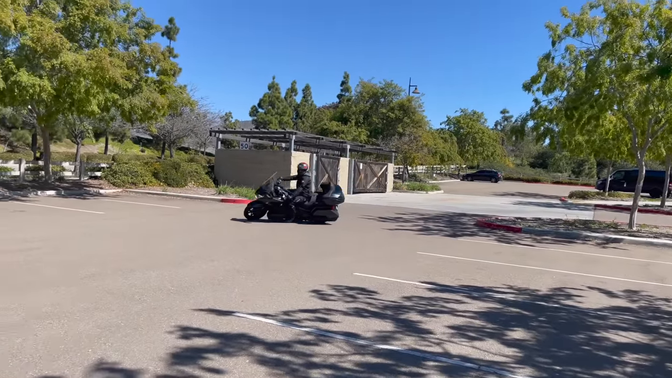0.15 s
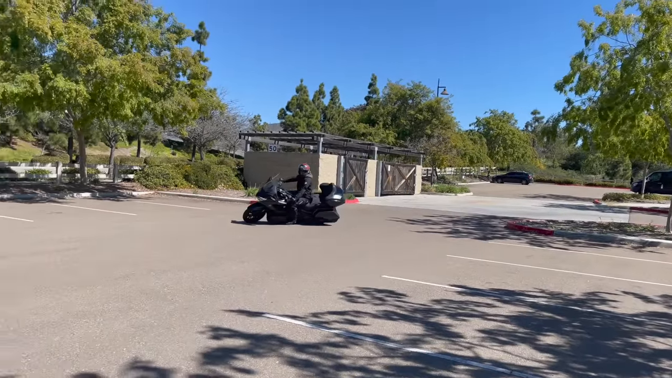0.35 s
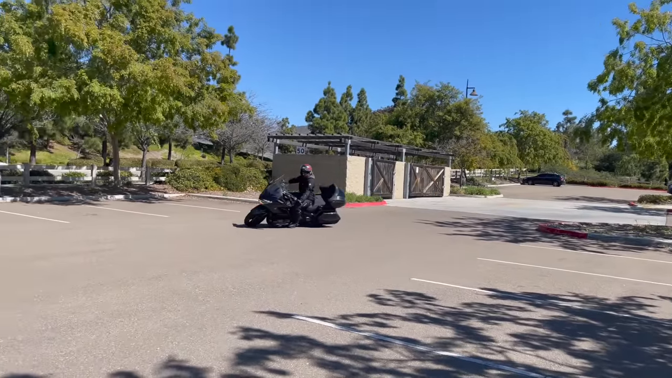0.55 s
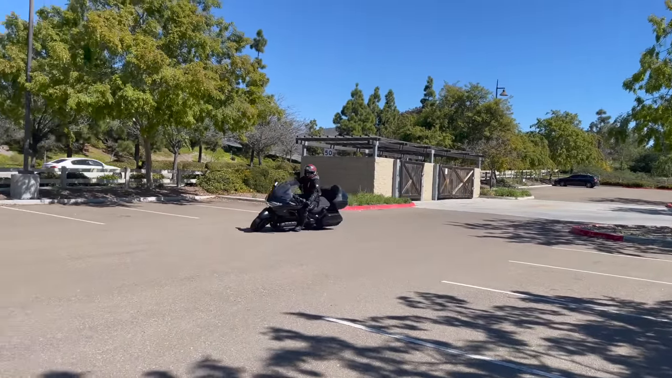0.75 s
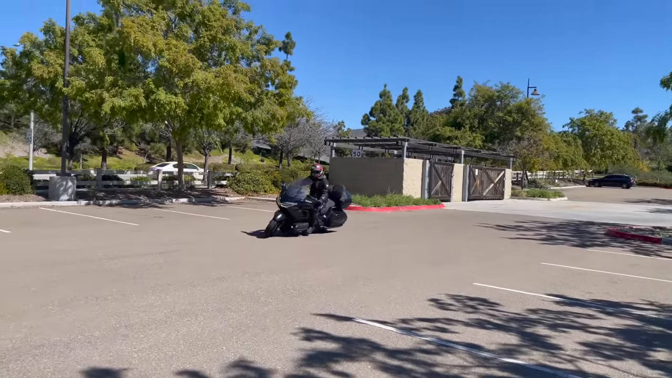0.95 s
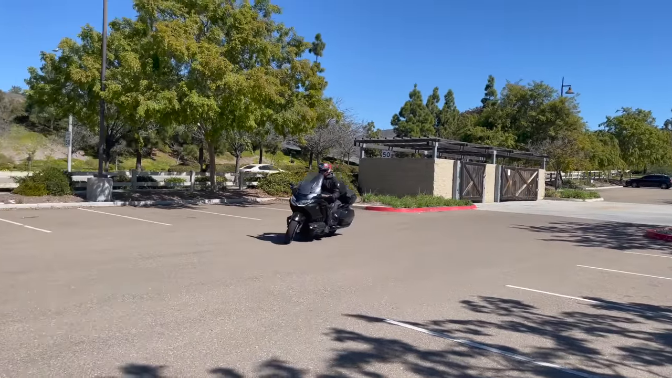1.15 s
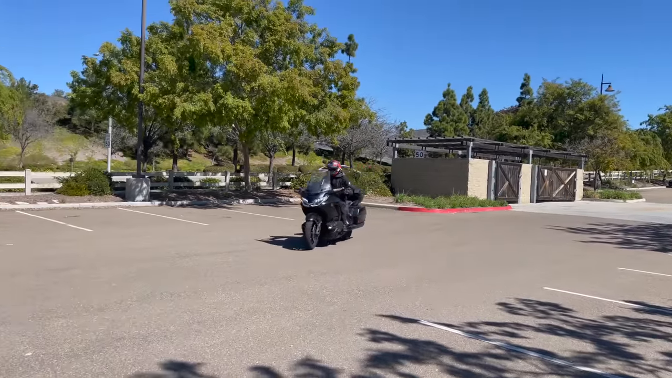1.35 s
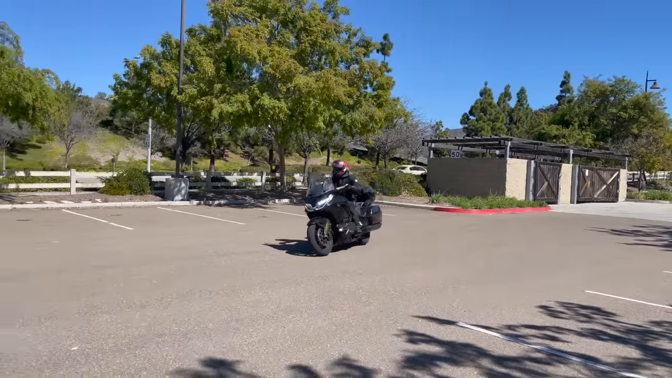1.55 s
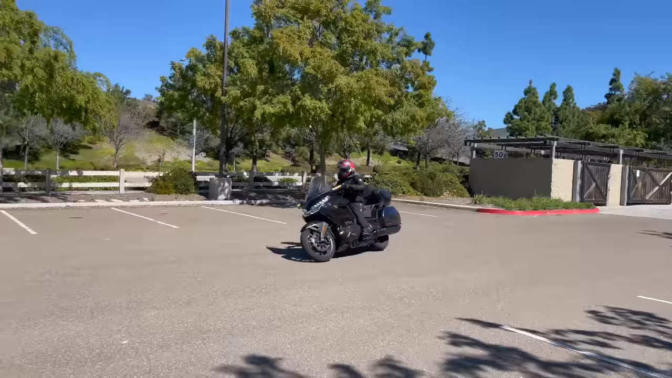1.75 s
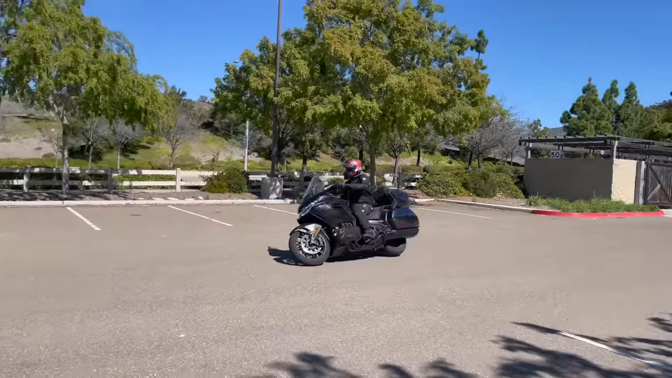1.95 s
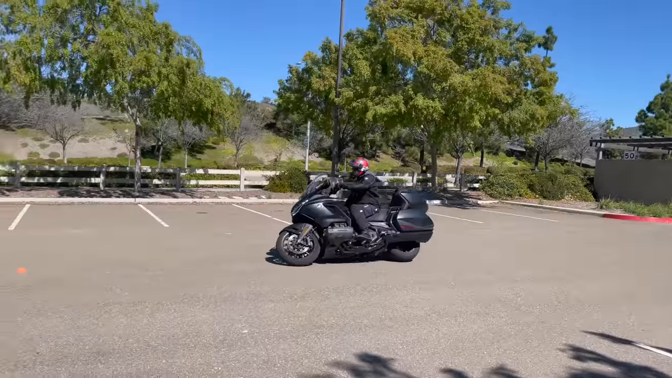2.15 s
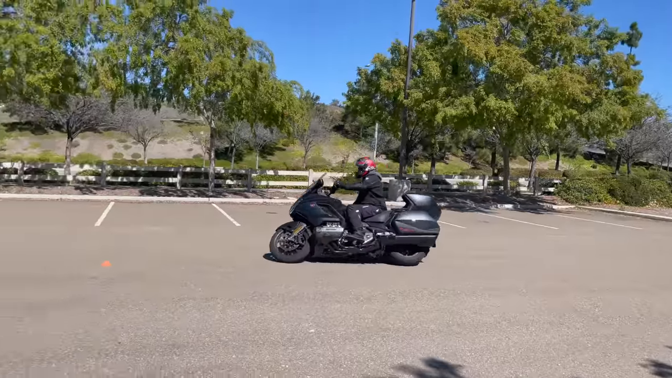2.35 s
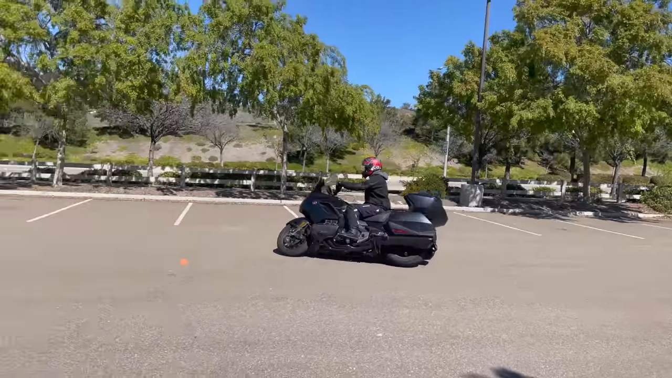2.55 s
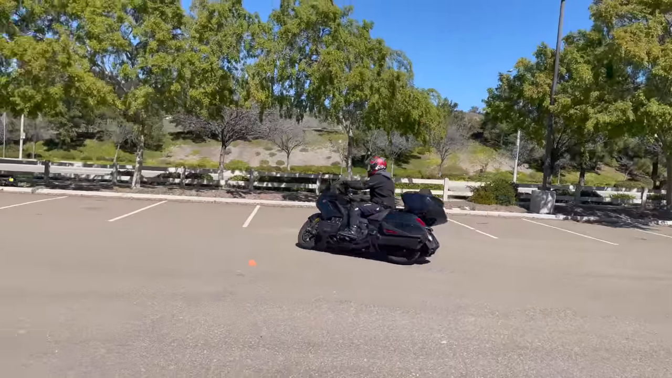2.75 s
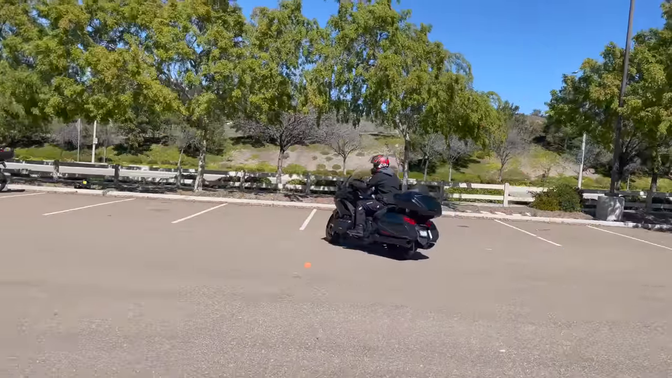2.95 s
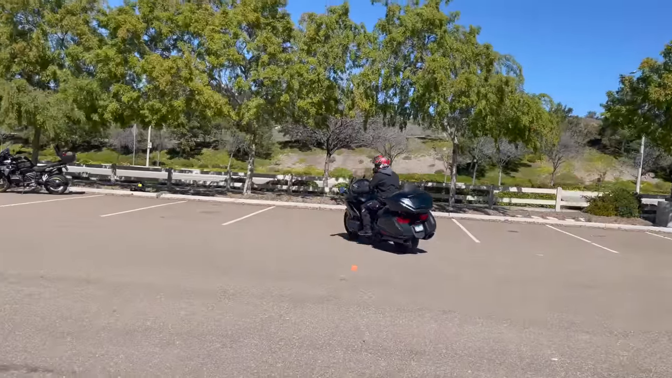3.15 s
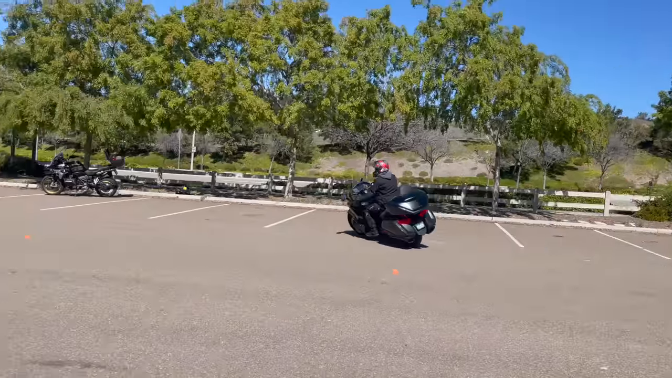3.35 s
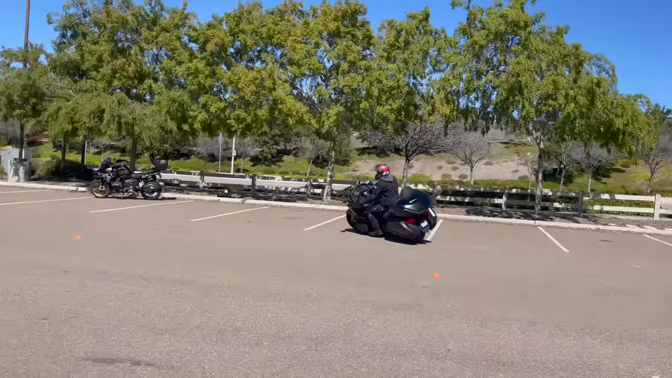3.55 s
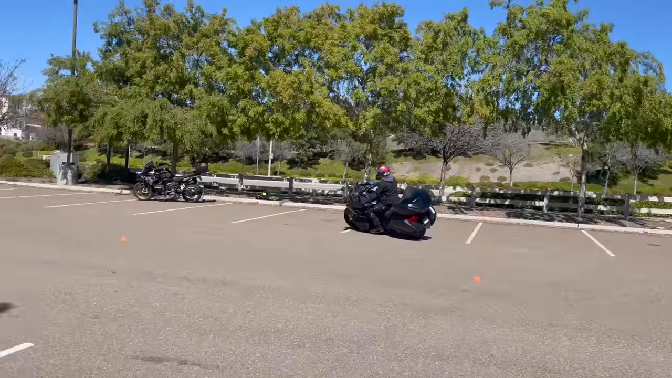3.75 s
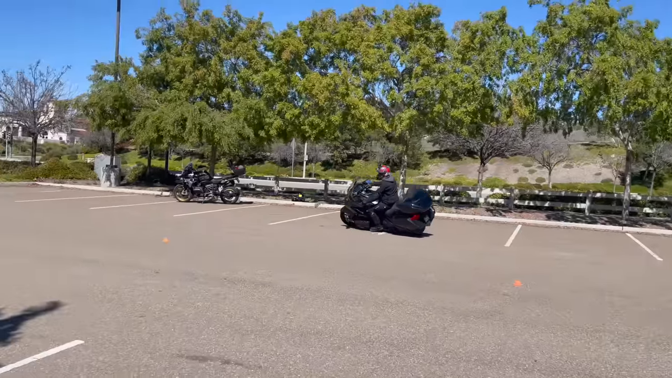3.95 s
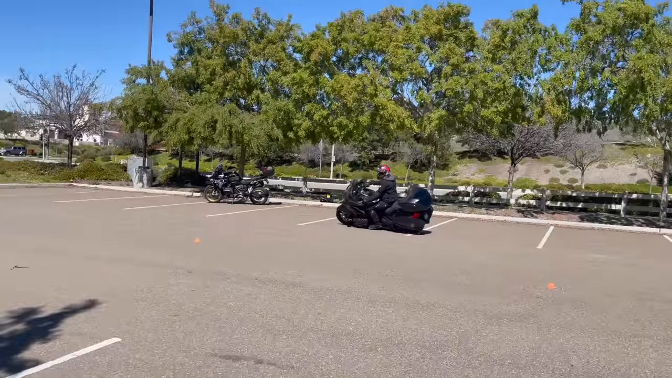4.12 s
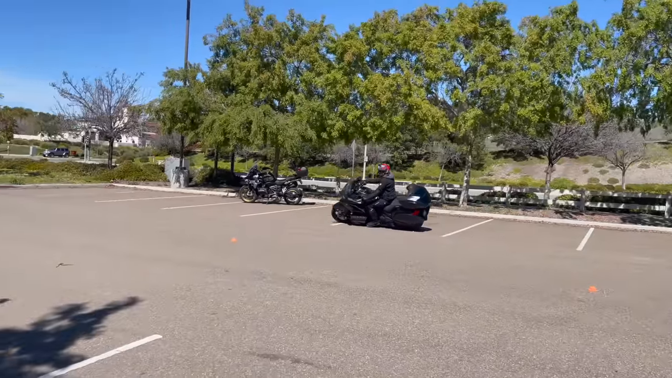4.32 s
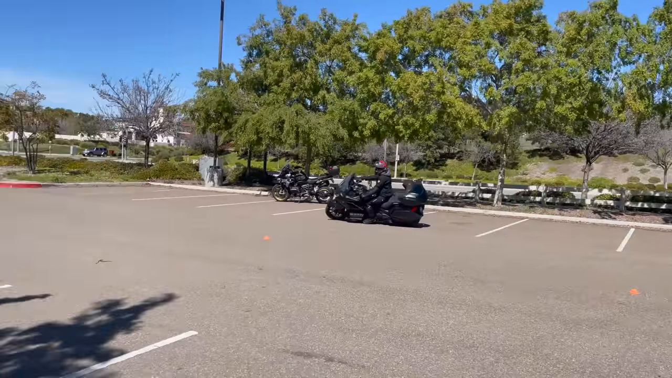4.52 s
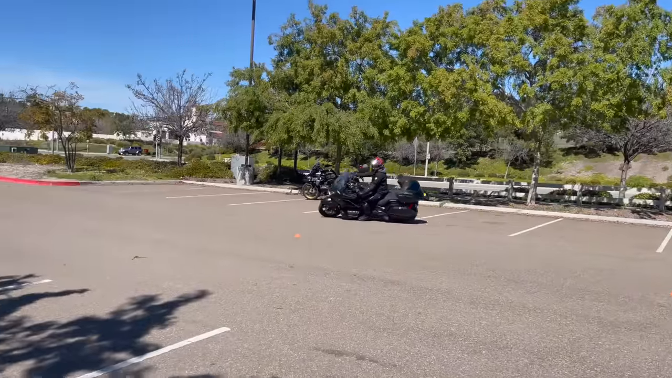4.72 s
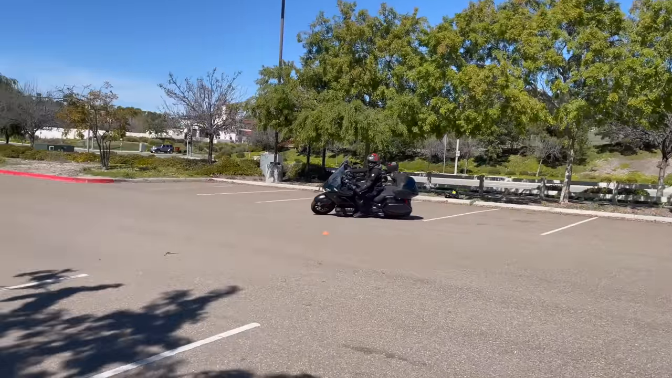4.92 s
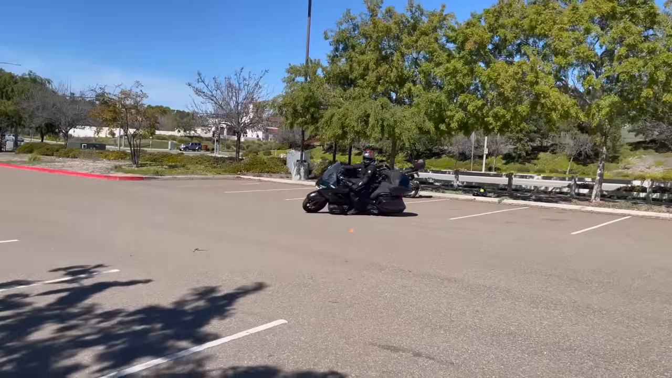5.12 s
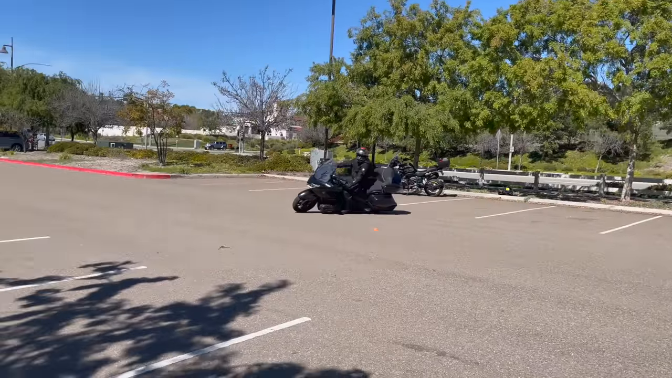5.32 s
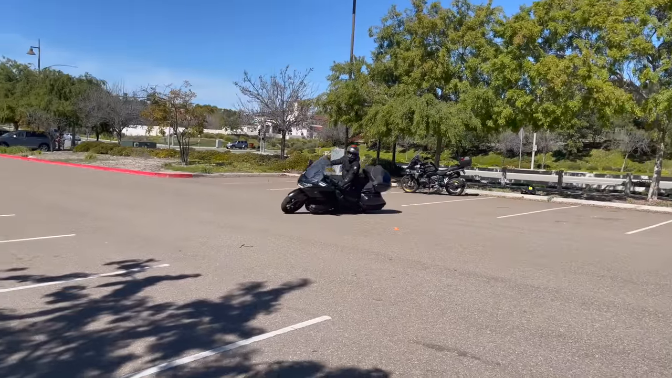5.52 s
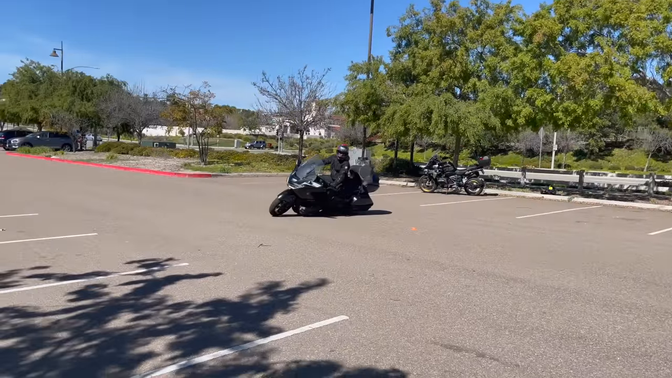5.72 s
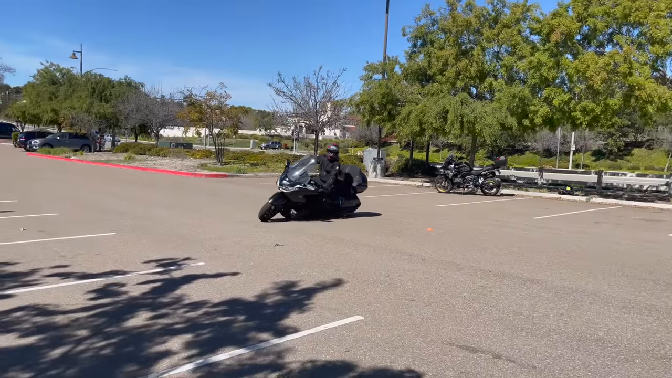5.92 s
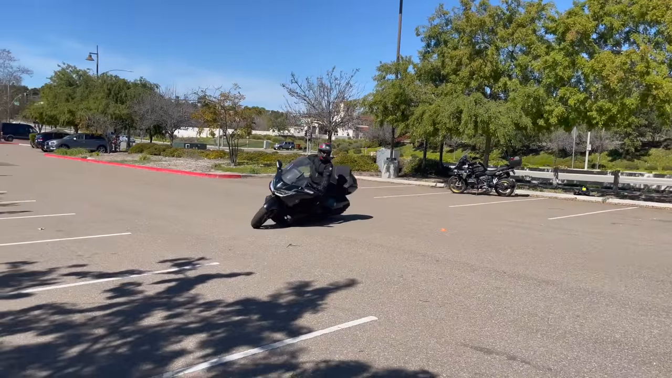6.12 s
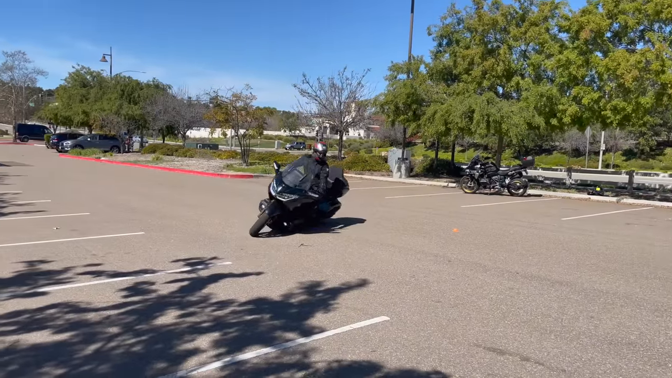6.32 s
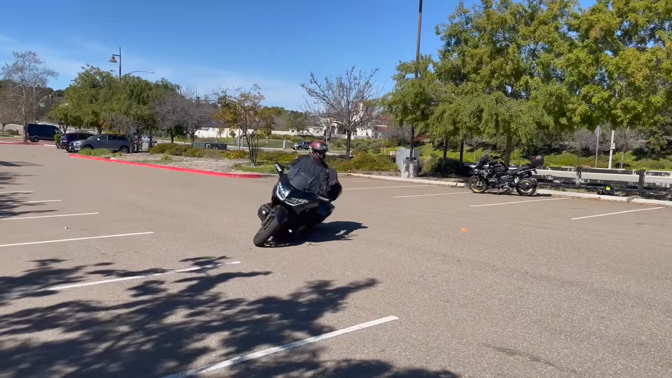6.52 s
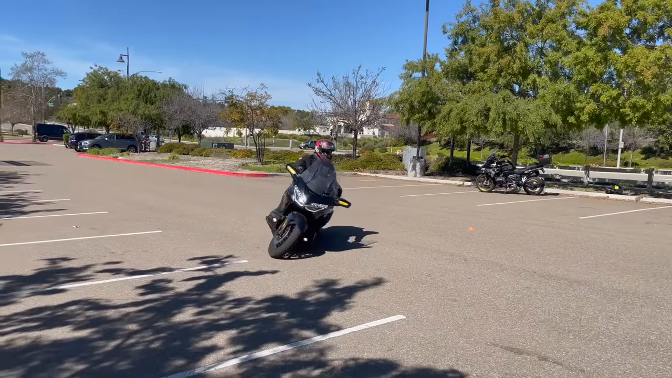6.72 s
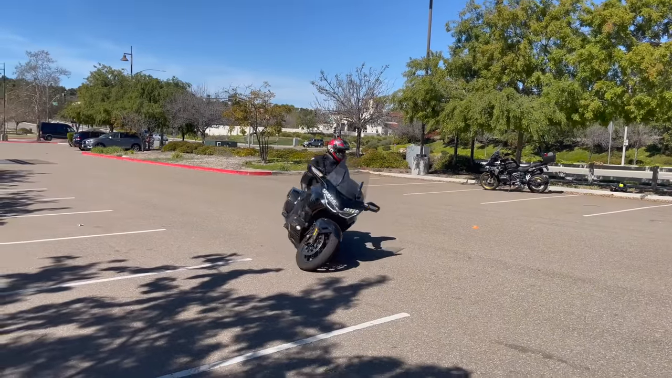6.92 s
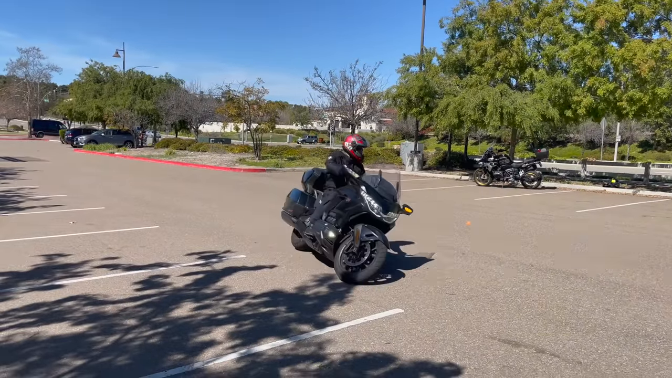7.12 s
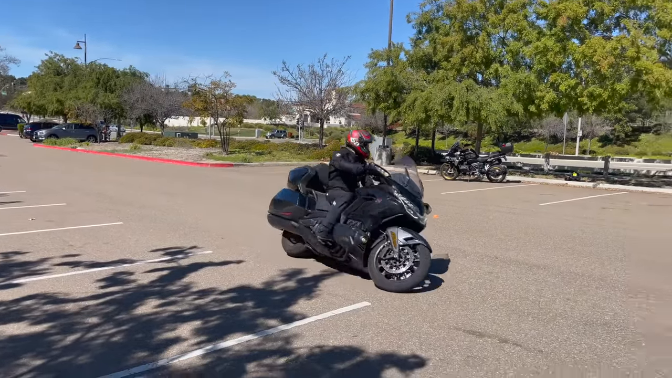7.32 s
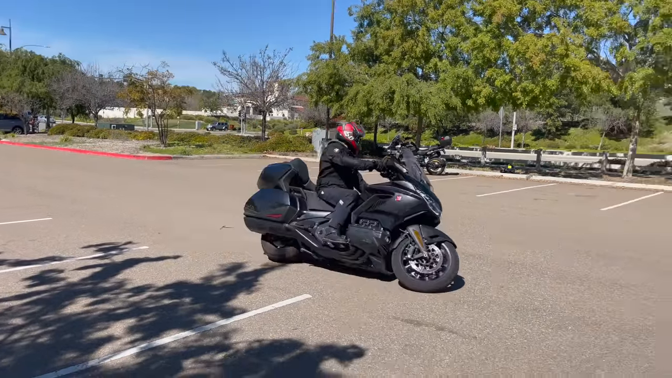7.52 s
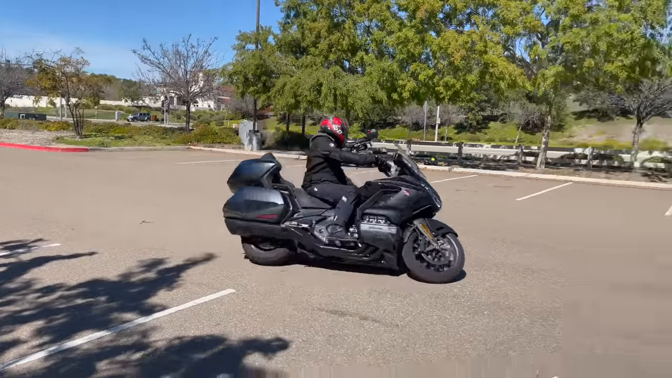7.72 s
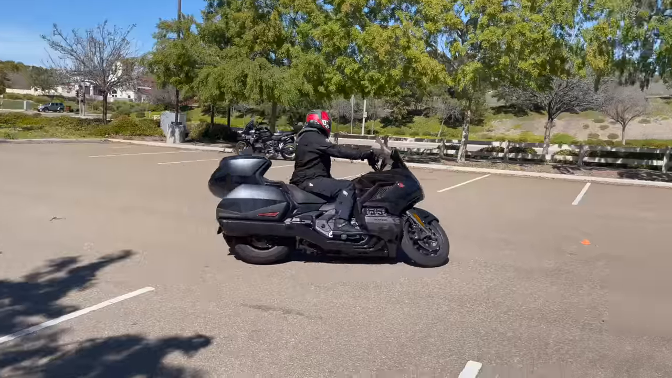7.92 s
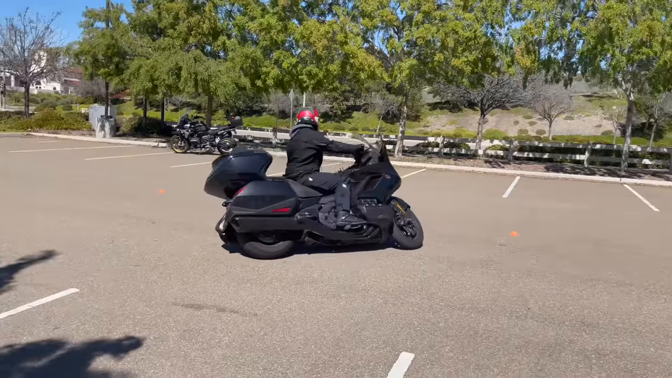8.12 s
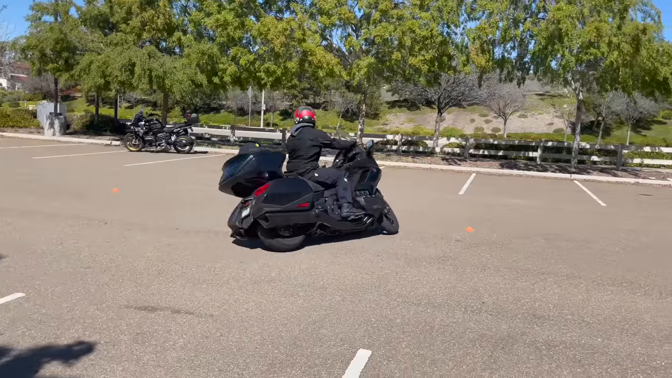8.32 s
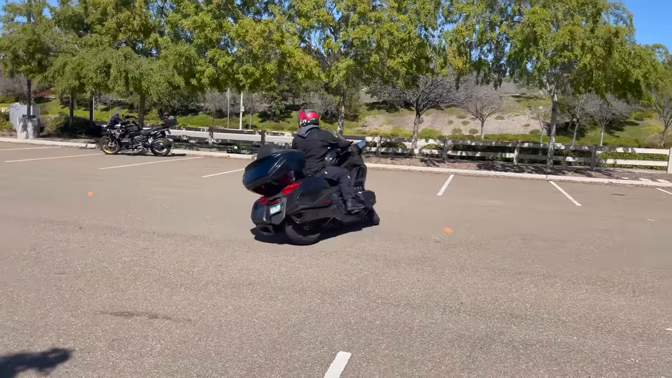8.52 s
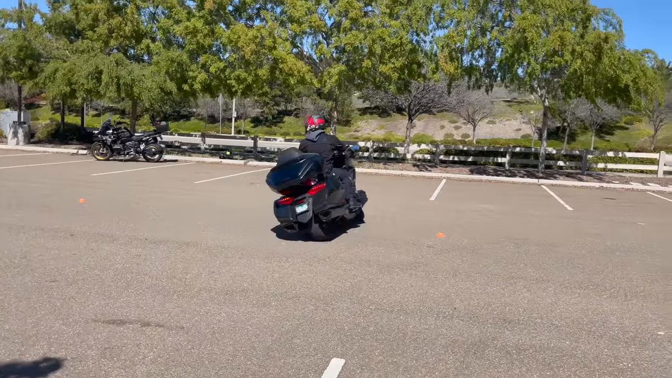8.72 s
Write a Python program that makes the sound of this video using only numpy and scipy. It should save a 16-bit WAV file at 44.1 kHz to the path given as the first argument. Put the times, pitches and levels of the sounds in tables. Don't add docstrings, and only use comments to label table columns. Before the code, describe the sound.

A large six-cylinder motorcycle rides slow tight turns on light throttle in an open, dry parking lot, heard by a hand-held phone in stereo. From 0 s its low, smooth hum around 100 Hz, with slightly uneven pulses, rumble and casing roar, climbs gradually in pitch until about 2.6 s; a short bodywork rattle comes near 1.2 s, a knock at 1.7 s, and tyre hiss grows around 2 to 2.7 s. The pitch dips near 3.2 s, briefly rises, then eases. From 3 to 7 s the bike is farther and softer, with thin gear whine, high leaf rustle and grit ticks, clustering near 6.4 s. After 7 s it swings close: exhaust hum strongest, tyres scrubbing, stones cracking sharply around 7.7 to 7.9 s. By 8.4 to 8.8 s the hum sinks lower as the throaty tailpipes face the phone. Faint low wind buffets throughout.

```python
import sys
import numpy as np
from scipy import signal
from scipy.fft import rfft, irfft, next_fast_len
from scipy.io import wavfile
from scipy.ndimage import uniform_filter1d

SR = 44100
rng = np.random.default_rng(int(sys.argv[2]) if len(sys.argv) > 2 else 0)


def generate_wav(sig):
    pcm = np.round(np.clip(np.atleast_2d(sig).T, -1, 1) * 32767).astype(np.int16)
    wavfile.write(sys.argv[1], SR, pcm)


def voltage_ratio(decibels):
    exponent = np.asarray(decibels, float) / 20
    return 10 ** exponent


N = 386757
STEP = 32

# (time [s], frequency of the strongest order [Hz])
ENGINE_SPEED = [(0.0, 97.3), (.65, 107.6), (1.0, 111.3), (1.25, 110), (1.5, 111.8), (2.0, 127.7),
                (2.3, 132.3), (2.6, 132.6), (3.18, 121.5), (3.6, 132.8), (4.0, 121.5), (4.3, 116.5),
                (5.0, 109), (5.63, 112.5), (6.4, 107.5), (7.6, 98), (8.3, 89), (8.77, 80.6)]
# (time [s], strongest order [dB], firing tone [dB], load on the engine [dB])
PIPE_FACING = [(0.0, -21.5, -30, .6), (.35, -22, -37, -.6), (.8, -26, -34, -1.1), (1.5, -24.5, -28, 1.5),
               (2.8, -26, -27.5, 3), (3.4, -29.5, -29, 1.5), (3.75, -35, -37, -1.5), (4.0, -33, -52, -2.5),
               (4.4, -27, -37, -3.5), (5.0, -23.5, -36, -4.5), (5.45, -25, -36, -2.1),
               (5.85, -30.5, -38, -1.1), (6.25, -26, -33, -.4), (6.6, -28, -38, 2.1), (7.05, -24, -35, .6),
               (7.6, -14.5, -31, 2.5), (8.35, -13, -30, 2.5), (8.77, -18, -35, 3)]
# (time [s], nearness of the engine [dB], tyre scrub [dB], share of grit underfoot [dB])
BIKE_PATH = [(0.0, 1.5, -53, -7), (.7, .6, -49, -5), (1.2, 2.1, -51, -8), (1.7, 1.1, -46.5, -7),
             (2.05, 3.5, -40.5, -7), (2.65, .6, -41.5, -5), (3.15, -1.2, -50.5, -6), (4.05, -5, -48, -1.1),
             (4.5, -2.5, -48.5, -3), (5.45, -3, -48, -9), (6.3, -4, -46.5, -3), (6.6, -3, -45, 2.1),
             (6.95, -2.1, -44, -4), (7.2, 1.3, -36.5, -3), (7.65, 4.5, -36, -2.1), (7.95, 4, -36, -2.5),
             (8.4, 2.5, -42, -2.1), (8.77, 1.5, -47, -7)]


def evened(x):
    return x / np.sqrt(np.mean(x ** 2) + 1e-20)


def read(points, hz):
    f, value = np.transpose(points)
    return np.interp(np.log(hz + 1), np.log(f + 1), value)


def curves(rows):
    s, *columns = np.transpose(rows)
    t = np.arange(N) / SR
    ease = round(.12 * SR)
    return [uniform_filter1d(np.interp(t, s, c), size=ease, mode="nearest") for c in columns]


def drift(hz, count):
    steps = rng.standard_normal((count, int(N / SR * 2 * hz) + 3))
    return signal.resample(steps, len(range(0, N, STEP)), axis=1)


def spread(slow):
    return signal.resample_poly(slow, STEP, 1, axis=-1, padtype="line")[..., :N]


def swell(t, start, end, ease):
    return (np.tanh((t - start) / ease) - np.tanh((t - end) / ease)) / 2


def follow(level_db, nearness, facing, load):
    main_db, _, load_db = curves(PIPE_FACING)
    near_db = curves(BIKE_PATH)[0]
    usual_db = -25
    return level_db + nearness * near_db + facing * (main_db - usual_db) + load * load_db


def coloured(x, spectrum):
    size = next_fast_len(N)
    response = voltage_ratio(read(spectrum, np.fft.rfftfreq(size, 1 / SR)))
    return irfft(rfft(x, size) * response, size)[..., :N]


def patchy(spectrum, patch_db, flicker_db):
    hop, frame = 256, 512
    frames, hz = N // hop + 5, np.fft.rfftfreq(frame, 1 / SR)
    field = uniform_filter1d(rng.standard_normal((frames, len(hz))), size=8, axis=0)
    field = evened(uniform_filter1d(field, size=7, axis=1))
    flicker = evened(uniform_filter1d(rng.standard_normal(frames), size=3))
    bands = evened(uniform_filter1d(field, size=90, axis=0))
    parts = rng.standard_normal((frames, len(hz), 4)).T
    gain_db = patch_db * (.85 * field + .55 * bands).T + flicker_db * flicker
    z = (parts[:2] + 1j * parts[2:]) * voltage_ratio(gain_db)
    noise = signal.istft(z, window="cosine", nperseg=frame, noverlap=frame - hop)[1][:, :N]
    return evened(coloured(noise, spectrum))


def resonate(x, hz, width):
    turn = np.exp(2j * np.pi * np.cumsum(hz) / SR)
    r = np.exp(-np.pi * width / SR)
    smooth = signal.lfilter([(1 - r) ** 2], [1, -2 * r, r * r], x * turn.conj())
    return 2 * (turn * smooth).real


def orders(table, turns, waver_db, wander):
    level, phase = drift(9, count=len(table)), drift(6, count=len(table))
    start = rng.random(len(table))
    total = 0
    for (twelfths, db), a, p, p0 in zip(table, level, phase, start):
        sine = np.sin(2 * np.pi * (twelfths * turns / 12 + p0) + wander * p)
        total = total + voltage_ratio(db + waver_db * a) * sine
    return np.sqrt(2) * total


def exhaust():
    # (twelfths of the strongest order [-], level [dB])
    bank_orders = [(9, 0), (13, -6.5), (15, -1.5), (18, 1.5), (21, -11.5), (24, -6), (30, -19)]
    # (twelfths of the strongest order [-], level [dB])
    crank_orders = [(8, 0.5), (10, 1), (14, 0.5), (16, -5.5), (17, -7.5), (20, -6), (26, -11), (28, -13.5)]
    # (frequency [Hz], gain [dB])
    muffler = [(145, 0), (172, 2.5), (200, -1.5), (240, -0.5)]
    hz, main_db, firing_db, _ = (c[::STEP] for c in curves(ENGINE_SPEED) + curves(PIPE_FACING))
    turns = np.cumsum(hz) * STEP / SR
    t = np.arange(0, N, STEP) / SR
    main = voltage_ratio(main_db) * orders([(12, 0), (36, -36)], turns, waver_db=0.77, wander=0.055)
    firing = voltage_ratio(firing_db - 1.0) * orders([(6, 0)], turns, waver_db=1.5, wander=.15)
    bank_db = follow(level_db=-39, nearness=.2, facing=.75, load=.4)[::STEP]
    bank_db = bank_db + 4.5 * swell(t, 8.45, 9.5, .15)
    banks = voltage_ratio(bank_db) * orders(bank_orders, turns, waver_db=.8, wander=0.08)
    crank_db = follow(level_db=-40.5, nearness=.55, facing=.3, load=.7)[::STEP]
    crank = voltage_ratio(crank_db) * orders(crank_orders, turns, waver_db=1.5, wander=.15)
    return coloured(spread(main + firing + banks + crank), muffler)


def whine_gains():
    # (which whine 0-3 [-], start [s], end [s], level over nearness [dB])
    whines = [(0, .25, 1.3, -44.5), (0, 1.3, 1.65, -43.5), (0, 1.65, 2.7, -52), (0, 3.9, 5.2, -45),
              (0, 5.2, 6.2, -40), (0, 6.2, 7.1, -42), (0, 7.1, 9.2, -42.5), (1, 1.0, 2.0, -59),
              (1, 2.0, 2.9, -48), (1, 2.9, 3.6, -55), (1, 3.6, 4.5, -50), (1, 7.1, 7.6, -56),
              (2, .5, .9, -54), (2, 1.6, 2.25, -48), (2, 2.25, 2.8, -49), (2, 4.15, 4.75, -47),
              (2, 5.7, 6.3, -50), (3, .9, 1.2, -52), (3, 7.2, 8.3, -44), (3, 8.3, 9.2, -46)]
    t = np.arange(0, N, STEP) / SR
    power = np.zeros((4, len(t)))
    for which, start, end, db in whines:
        power[int(which)] += voltage_ratio(db) ** 2 * swell(t, start, end, .08)
    gains = np.sqrt(abs(power)) * voltage_ratio(1.1 * drift(7, count=4))
    return spread(gains) * voltage_ratio(curves(BIKE_PATH)[0])


def machinery():
    # (frequency [Hz], density [dB per Hz])
    rumble_spectrum = [(30, -38), (45, -12), (70, -10.5), (130, -8), (200, -5.5), (300, -8), (400, -12.5),
                       (520, -24.5), (900, -61)]
    # (frequency [Hz], density [dB per Hz])
    roar_spectrum = [(250, -10), (450, -6), (650, -0.5), (820, 1), (950, -7), (1300, -7.5), (1700, -7),
                     (2000, -17.5), (2400, -15.5), (2800, -51.5), (4000, -43)]
    # (which whine 0-3 [-], order [-], width [Hz], level [dB])
    gears = [(0, 14.7, 95, 1.34), (1, 29.3, 190, -0.5), (2, 6.35, 16, 2.5), (2, 5.9, 15, -1.5),
             (3, 8.5, 22.5, 0)]
    hz, whine = curves(ENGINE_SPEED)[0], whine_gains()
    since_firing = np.cumsum(hz / 2) / SR % 1
    puff = 1 + .5 * np.exp(-since_firing / 0.34)
    rumble = evened(puff * patchy(rumble_spectrum, patch_db=0.58, flicker_db=0.44))
    rumble = rumble * voltage_ratio(follow(level_db=-32.3, nearness=.3, facing=.01, load=.95))
    roar = evened(puff * patchy(roar_spectrum, patch_db=1.42, flicker_db=0.56))
    roar = roar * voltage_ratio(follow(level_db=-35.5, nearness=.95, facing=.01, load=.05))
    air = puff * rng.standard_normal(N)
    mesh = 0
    for which, order, width, db in gears:
        fuzz = evened(resonate(air, order * hz, width))
        line = np.sin(2 * np.pi * order * np.cumsum(hz) / SR)
        mesh = mesh + whine[int(which)] * voltage_ratio(db) * (fuzz + 10 / width * line)
    return rumble + roar + mesh


def tyres():
    # (frequency [Hz], density [dB per Hz])
    hiss_spectrum = [(1200, -3), (2000, 0.5), (2800, 1), (3800, 2), (5000, -.4), (6000, .4), (7200, -3.5),
                     (9000, -1.5), (10200, 6), (11100, 5), (11800, -1), (12400, -10), (13200, -21),
                     (14000, -60)]
    hiss_db, grit_db = curves(BIKE_PATH)[1:]
    clumps = spread(voltage_ratio(5.5 * drift(18, count=1)[0]))
    cracked = rng.random(N) < 350 * clumps / SR
    cracks = cracked * voltage_ratio(3.6 * np.minimum(rng.exponential(1, N), 4))
    decay = np.exp(-np.arange(600) / SR / 0.0021)
    power = abs(signal.oaconvolve(cracks ** 2, decay)[:N])
    grit = evened(coloured(rng.standard_normal((2, N)) * np.sqrt(power), hiss_spectrum))
    hiss = patchy(hiss_spectrum, patch_db=2.0, flicker_db=0.4)
    return voltage_ratio(hiss_db + 4.1) * (hiss + voltage_ratio(grit_db) * grit)


def hits(table):
    t = np.arange(2400) / SR
    out = np.zeros(N + len(t))
    for s, db, hz, ring, width in table:
        burst = resonate(rng.standard_normal(len(t)), hz + 0 * t, width)
        burst = burst * voltage_ratio(-60 * t / ring) * np.minimum(t / 0.00047, 1)
        out[round(s * SR):][:len(t)] += voltage_ratio(db - 2.5) * burst / abs(burst).max()
    return out[:N]


def impacts():
    # (time [s], peak [dB], centre [Hz])
    stones = [(0.766, -25, 5780), (1.2062, -31, 3260), (1.475, -35, 4250), (2.4718, -22, 3870),
              (3.3077, -27, 3730), (3.5753, -25, 3780), (3.6556, -30, 3620), (3.7643, -30, 9500),
              (4.0257, -25, 2900), (4.1285, -28, 8180), (4.6174, -29, 6900), (4.7212, -25, 7810),
              (4.8643, -29, 8610), (5.5094, -27, 5600), (6.2013, -25, 5560), (6.2532, -24, 3500),
              (6.398, -25, 5630), (6.4298, -18.5, 4900), (6.4827, -23, 5700), (6.603, -24, 5730),
              (6.6473, -28, 5670), (6.7486, -24, 5530), (6.9795, -23, 7490), (7.6809, -18, 4100),
              (7.7613, -18, 2580), (7.887, -14, 2820), (8.418, -21, 2800), (8.4577, -21, 3470),
              (8.552, -17.5, 4290), (8.6901, -32, 3650)]
    # (time [s], peak [dB], centre [Hz])
    rattle = [
        (1.157, -15, 778),
        (1.194, -22, 754),
        (1.234, -22, 608),
        (1.281, -24, 724),
        (1.311, -18, 1090),
    ]
    # (time [s], peak [dB])
    spits = [(3.0756, -35), (3.5799, -33), (3.7645, -31), (4.1287, -31), (4.2439, -33), (4.8645, -30),
             (4.9134, -31), (6.201, -34), (6.3975, -32), (6.616, -31), (6.7482, -27), (6.9692, -29),
             (7.1403, -28), (7.5444, -24), (7.71, -25), (8.0967, -29)]
    # (time [s], peak [dB], centre [Hz], ring [s], width [Hz])
    knocks = [(1.708, -17, 1800, 0.012, 600), (1.708, -12, 2600, 0.009, 1900), (2.477, -20, 1950, .02, 900),
              (2.616, -18, 2400, .02, 900), (3.189, -16.5, 1260, .035, 800), (6.431, -20, 1650, .035, 1100),
              (6.46, -17.5, 1700, .02, 600), (7.886, -17, 1500, .02, 900)]
    blows = [row + (.018, 2800) for row in stones]
    blows += [row + (.04, 600) for row in rattle]
    blows += [(s, db + 5, 11200, .014, 2600) for s, db in spits]
    return hits(blows + knocks)


def radiators():
    # (start [s], end [s], level [dB])
    front = [
        (-.5, 1.4, -56),
        (5.8, 6.95, -52),
        (7.0, 7.6, -52),
    ]
    t = np.arange(N) / SR
    air = evened(resonate(rng.standard_normal(N), 5700 + 0 * t, 1300))
    breath = spread(voltage_ratio(1.5 * drift(8, count=1)[0]))
    return air * breath * sum(voltage_ratio(db) * swell(t, start, end, .15) for start, end, db in front)


def leaves():
    # (frequency [Hz], density [dB per Hz])
    rustle = [(4000, -30), (6500, -6), (8500, -3), (11000, 2.1), (12400, -4), (13200, -18), (14000, -60)]
    t = np.arange(N) / SR
    return voltage_ratio(-54.5) * swell(t, 3.4, 7.6, .25) * patchy(rustle, patch_db=2.5, flicker_db=1.2)


def wind():
    # (frequency [Hz], density [dB per Hz])
    buffeting = [(22, -30), (35, -10), (50, 1.5), (80, 2.5), (150, -10), (300, -35), (600, -90)]
    gusts = spread(voltage_ratio(4.0 * drift(3, count=2)))
    return voltage_ratio(-36) * evened(coloured(gusts * rng.standard_normal((2, N)), buffeting))


def scene():
    return exhaust() + machinery() + tyres() + impacts() + radiators() + leaves() + wind_free_rest()


def wind_free_rest():
    return 0


def at_ports(dry):
    # (frequency [Hz], likeness 0-1 [-])
    likeness = [(100, 1), (430, 0.91), (560, 0.54), (800, 0.64), (1100, 0.083), (1600, 0.65), (2300, 0.63),
                (2700, 0.12), (3000, 0.73), (4000, 0.19), (5800, 0.27), (7600, 0.17), (8400, .4),
                (8750, .97), (9400, .8), (9800, 1), (10400, 1), (11100, .88), (11700, 1), (12300, 1),
                    (12700, .2)]
    # (frequency [Hz], left minus right [dB])
    balance = [(400, 0), (600, 2.5), (1500, 3), (2100, -6.5), (2650, -0.5), (3000, -3.5), (3400, 8.5),
               (4500, 3.5), (5400, 2.5), (6000, -0.5), (7300, -0.5), (8500, 0.5), (9600, .8)]
    # (frequency [Hz], lead [half turns])
    lead = [(50, .04), (150, .085), (300, .1), (500, .2), (1500, 0), (2100, 0), (2600, .33), (3300, .9),
            (3900, 1.1), (4600, 2.3), (5800, 4), (7000, 4.6), (8700, 4), (9750, 3), (10420, 3), (11700, 2)]
    size = next_fast_len(N)
    hz = np.fft.rfftfreq(size, 1 / SR)
    direct, scattered = rfft(dry, size)
    same = np.clip(read(likeness, hz), 0, 1)
    right = same * direct + np.sqrt(1 - same ** 2) * 1j * scattered
    right = right * np.exp(-1j * np.pi * read(lead, hz))
    tilt = voltage_ratio(read(balance, hz) / 2)
    return irfft(np.array([direct * tilt, right / tilt]), size)[:, :N]


def thinned(ports):
    # (frequency [Hz], level [dB])
    faintest = [(2500, -84), (9000, -84), (9800, -80), (12000, -78), (13300, -77), (13800, -62)]
    pair = np.array([ports[0] + ports[1], ports[0] - ports[1]]) / 2
    hz, _, z = signal.stft(pair, SR, nperseg=1024)
    band_db = 10 * np.log10(uniform_filter1d(abs(z) ** 2, size=9, axis=1) + 1e-20)
    jitter_db = 2.5 * np.repeat(rng.standard_normal(N // 1024 + 2), 2)[:z.shape[-1]]
    kept = (band_db > read(faintest, hz)[:, None] + jitter_db) | (hz < 2500)[:, None]
    both, apart = signal.istft(z * kept, SR, nperseg=1024)[1][:, :N]
    return np.array([both + apart, both - apart])


def top_cut(x):
    return signal.sosfilt(signal.butter(12, 13280, fs=SR, output="sos"), x)


def record(dry):
    finished = thinned(at_ports(dry) + wind())
    return top_cut(finished)


dry = scene()
out = record(dry)
generate_wav(out)
```